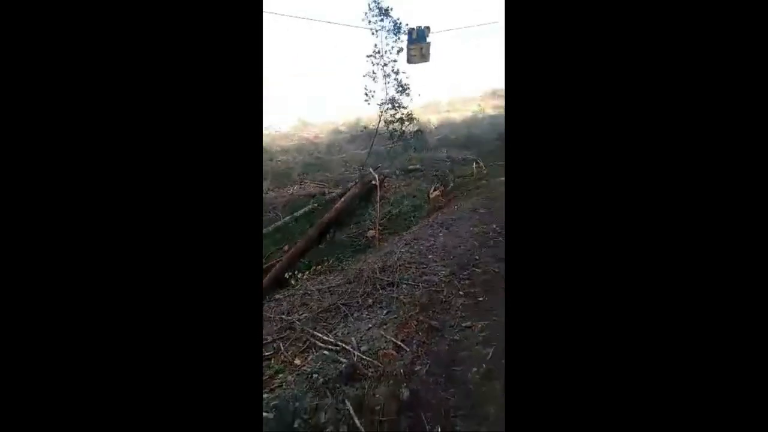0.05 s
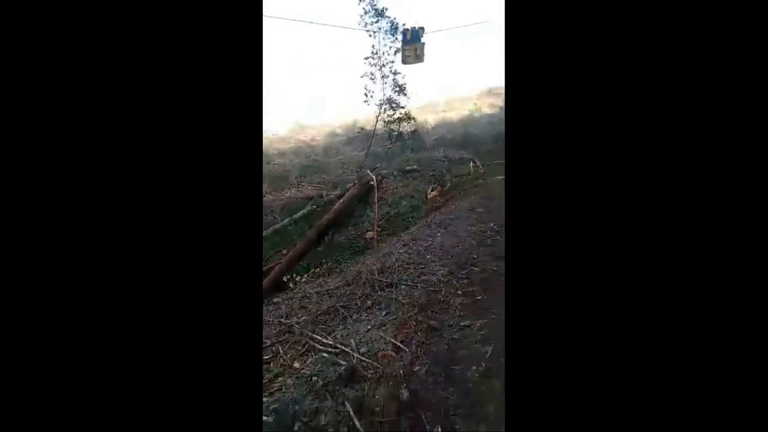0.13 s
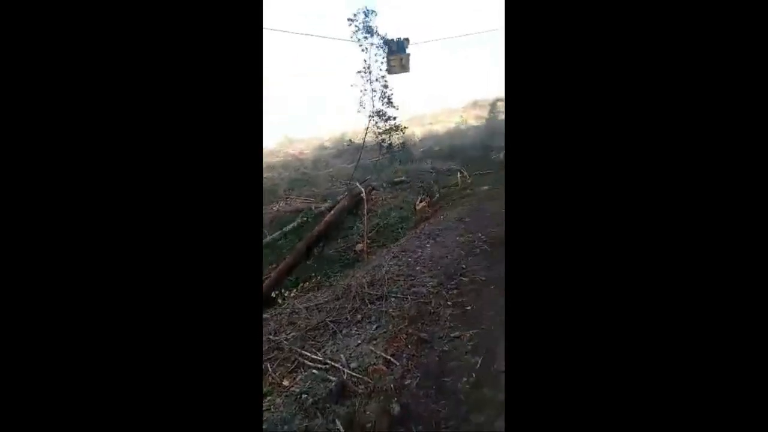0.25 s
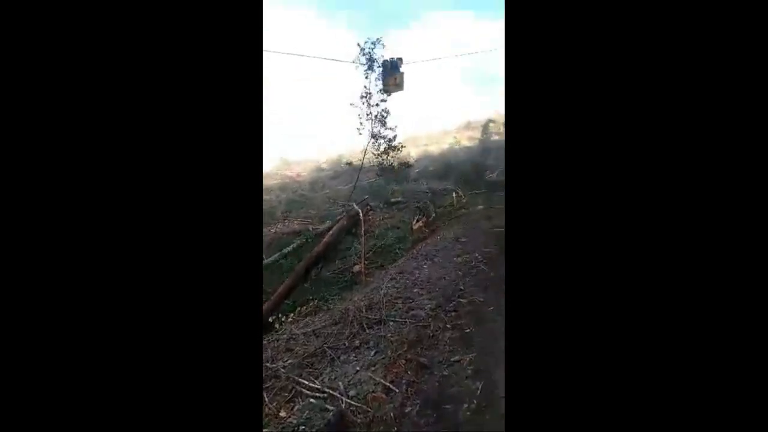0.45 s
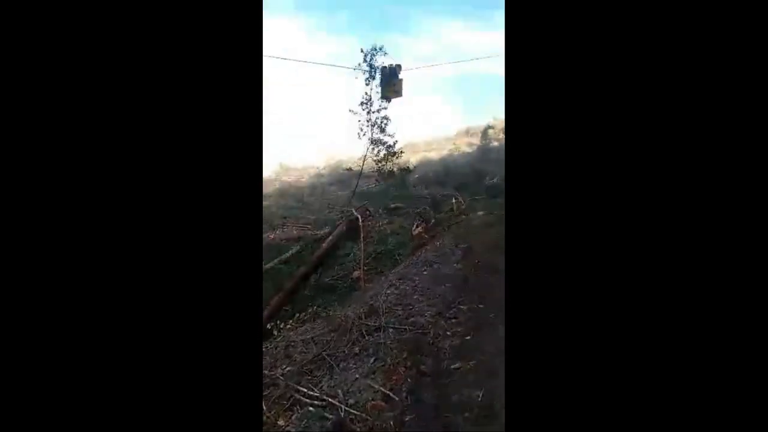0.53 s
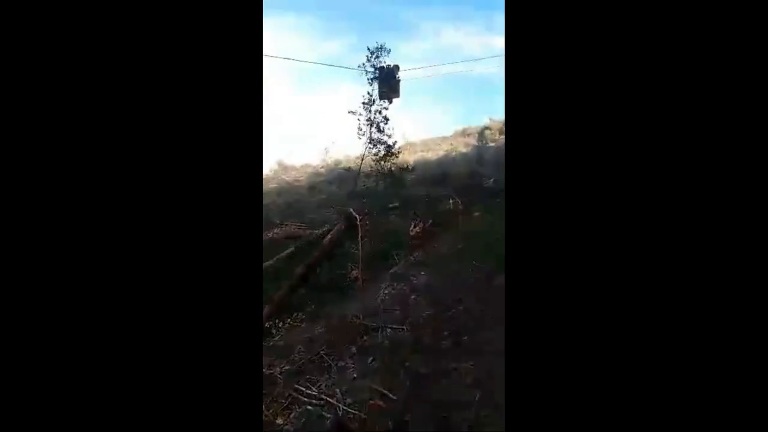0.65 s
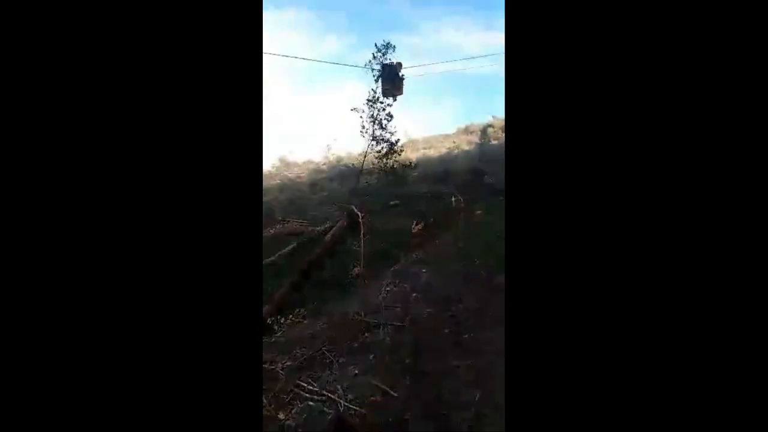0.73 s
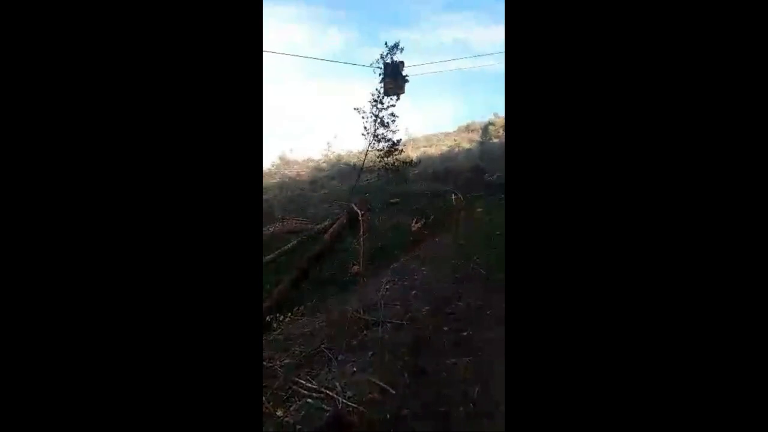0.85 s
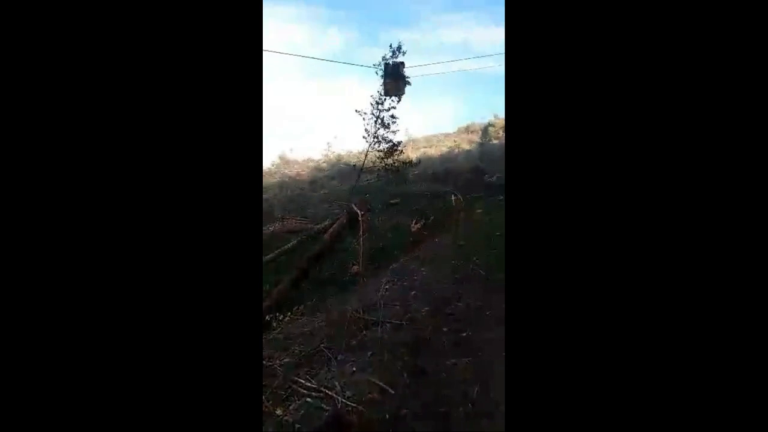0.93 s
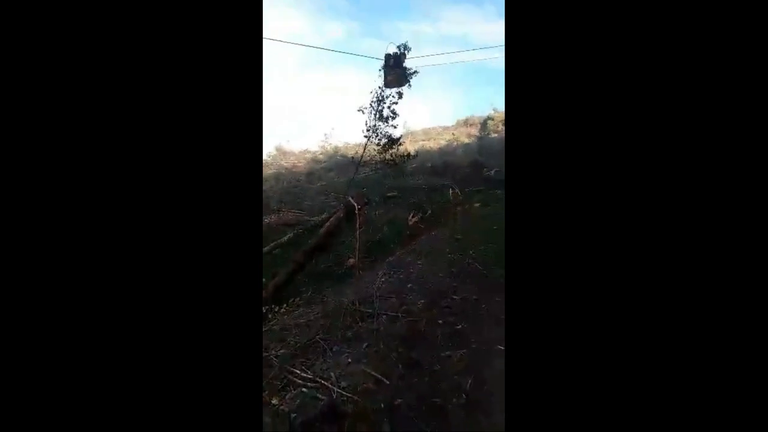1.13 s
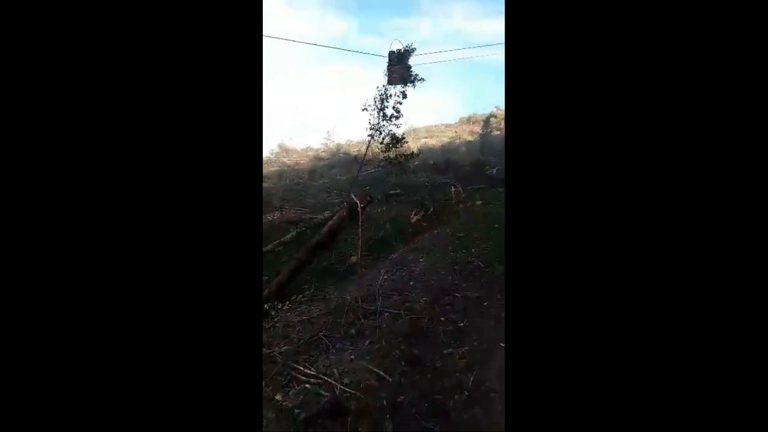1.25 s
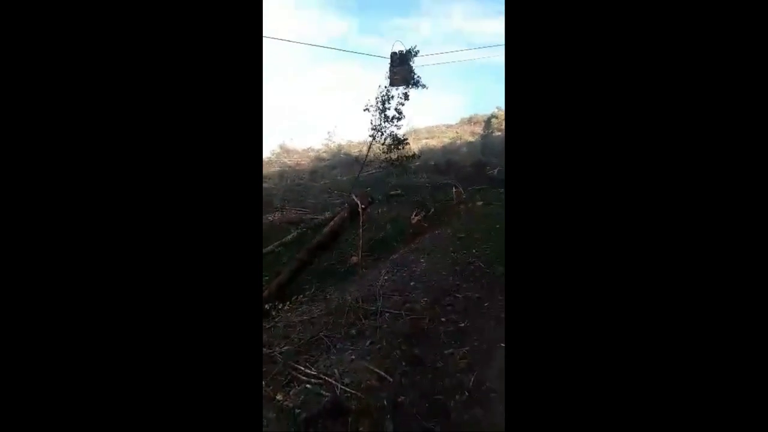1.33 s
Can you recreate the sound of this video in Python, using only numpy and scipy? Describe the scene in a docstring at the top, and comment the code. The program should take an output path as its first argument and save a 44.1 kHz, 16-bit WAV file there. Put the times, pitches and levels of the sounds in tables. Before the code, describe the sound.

A log on a cable strikes a hillside with a sharp crack and thud, then slides through dry brush, fading. Twigs snap and the rigging squeaks over a low diesel idle, heard in stereo outdoors.

```python
"""A log on a logging cable cracks against a hillside, thuds, and slides on through dry brushwood,
rustling and fading. Twigs snap, the running cable sings and scrapes, and the rigging squeaks.
In the background an eight-cylinder diesel idles unevenly over faint outdoor air.
Heard from a stereo microphone on the slope; the sound reaches its left port slightly before the right."""
import sys
import numpy as np
from scipy import signal
from scipy.fft import rfft, irfft, next_fast_len
from scipy.io import wavfile
from scipy.ndimage import map_coordinates

SR = 44100
rng = np.random.default_rng(int(sys.argv[2]) if len(sys.argv) > 2 else 0)


def waveform_to_disk(signal):
    """Save audio, clipped to [-1, 1], as 16-bit WAV at the path in sys.argv[1]."""
    frames = np.transpose(np.atleast_2d(signal))
    scaled = np.clip(frames, -1, 1) * 32767
    samples = np.round(scaled).astype(np.int16)
    wavfile.write(sys.argv[1], SR, samples)


N = 61739


def log_blows():
    """The log strikes the slope: hard contacts ring its upper modes, soft ground its lowest."""
    # blows and the spectrum of each contact: start_s, level_db, centre_hz, width_octaves
    blows = [(.2155, -18, 475, 0.75), (.2412, -9.5, 700, 0.43), (.2486, -4.5, 646, 0.6),
             (0.2542, -8, 376, 0.27), (0.2584, -2.5, 149, .6), (.265, -5.5, 140, 0.36),
             (0.2716, -12, 443, .7), (0.2867, -7, 310, .25), (0.2931, -5, 210, 0.19),
             (0.3029, -15, 220, 0.28), (0.3231, -18, 270, 0.43), (.343, -15, 168, 0.58),
             (.9682, -23, 710, 0.4)]
    # modes of the log: pitch_hz, level_db, t60_s
    modes = [(153, 4.5, 0.035), (218.5, 2, 0.084), (315, 2, 0.091), (388, -0.5, 0.061), (639, -7, 0.1),
             (675, 5.5, 0.033), (782, -2.5, 0.044), (977, -1.5, 0.061), (1400, 2, 0.15)]
    attack_s = 0.0018
    out = np.zeros(N)
    for start_s, blow_db, centre_hz, octaves in blows:
        t = since(start_s)
        attack = 1 - np.exp(-t / attack_s)
        for hz, mode_db, t60 in modes:
            weight = np.exp(-np.log2(hz / centre_hz) ** 2 / (2 * octaves ** 2)) / 2
            swing = np.sin(2 * np.pi * hz * t * (1 + rng.normal(0, 0.0041)))
            decay = amp(blow_db + mode_db + rng.normal(0, 1) - 60 * t / t60)
            out += weight * attack * decay * swing
    return out


def wood_cracks():
    """Dry wood splits in short bursts that ring in the treble, each with its own brightness."""
    # cracks: start_s, peak_db, t60_s, treble_edge_hz
    cracks = [(0.2081, -31, .02, 4000), (.2377, -4.5, 0.006, 5850), (0.2396, -2.5, 0.003, 9000),
              (0.2413, -12.5, .007, 6000), (0.2433, -7.5, 0.011, 3170), (0.437, -32, .023, 3500),
              (0.6804, -17.5, 0.015, 6000), (0.857, -22.5, 0.069, 3520), (0.9633, -19.5, 0.017, 3000),
              (0.969, -26, 0.048, 2600), (1.071, -28.5, 0.038, 4530)]
    # resonances of splintering wood: pitch_hz, width_hz, level_db
    splinter = [(730, 330, 3), (1410, 440, -8), (2250, 400, -3), (3240, 380, 1.5), (3740, 450, 6.5),
                (4410, 350, 5), (5510, 560, 5), (6600, 200, -1.5), (7320, 79, -20), (10520, 420, 4.5),
                (12070, 910, 3.5)]
    out = np.zeros((2, N))
    for start_s, peak_db, t60, edge_hz in cracks:
        t = since(start_s)
        burst = noise() * (t > 0) * amp(-60 * t / t60)
        ring = ringing(burst, splinter)
        crack = spread(filtered(ring, lambda hz: 1 / (1 + 1j * hz / edge_hz) ** 2))
        out += amp(peak_db) * crack / abs(crack).max()
    return out


def brush_crush():
    """Brushwood gives way under the landing log."""
    # spectrum of the crush: frequency_hz, level_db
    spectrum = [(30, -42), (80, -15), (140, -17), (230, -2.5), (340, -2), (520, -16.5), (680, -3),
                (950, -8.5), (1900, -15.5), (2600, -16), (3400, -42), (8000, -43), (13000, -65)]
    level_db, rise_s, t60_s = -19, 0.0054, 0.39
    t = since(start_s=0.2387)
    envelope = amp(level_db - 60 * t / t60_s) * (1 - np.exp(-t / rise_s))
    return envelope * coloured(twig_fractures(), spectrum)


def log_slide():
    """The log drags through twigs in small jerks while the cable sings."""
    # course of the slide: time_s, rustle_db, treble_db
    course = [(.195, -54, -60.5), (.21, -37, -48.5), (.235, -37, -56), (0.253, -24, -42.5),
              (.34, -28.5, -36.5), (.41, -34.5, -37.5), (0.454, -29, -35.5), (.52, -31.5, -42),
              (0.612, -35, -49.5), (.69, -31.5, -46), (.73, -34, -42.5), (.78, -37.5, -41),
              (.82, -39, -49.5), (0.863, -35, -46.5), (.92, -41, -46.5), (.98, -42, -54.5),
              (1.07, -47.5, -48.5), (1.18, -57, -65.5), (1.39, -85, -89)]
    # spectrum of the rustle: frequency_hz, level_db
    rustle = [(100, -29), (240, 12), (480, 2.5), (660, 11.5), (950, 3), (1400, 2.5), (2000, 6), (2700, -7),
              (3300, -1.5), (4800, -10.5), (5800, -30), (7000, -63), (9000, -59)]
    # spectrum of its treble fizz: frequency_hz, level_db
    fizz = [(3000, 4.5), (5500, 3), (6600, 2), (8000, -9), (9000, 1), (10600, -1), (11300, -12),
            (12500, -9), (13500, -54)]
    times, rustle_db, treble_db = np.transpose(course)
    jerk_db = 1.66
    level, treble = (amp(np.interp(since(0), times, db) + jerk_db * wobble(58.68))
                     for db in (rustle_db, treble_db))
    return level * (cable_song() + coloured(friction(), rustle)) + treble * coloured(friction(), fizz)


def friction():
    """Breaking twigs and scraping steel in equal parts."""
    return unit(twig_fractures()) + strand_scrapes()


def twig_fractures():
    """Twigs break in dense tiny clicks of uneven size."""
    clicks_per_s, spread_db = 9000, 1.5
    sizes = noise() * amp(spread_db * rng.standard_normal(N))
    return shifting_contact(sizes * (rng.random(N) < clicks_per_s / SR))


def shifting_contact(pair):
    """Narrow bands swell and fade on their own as the points of contact shift."""
    swell_db, width_hz, length_s = 4.5, 100, .08
    hz, t, bands = signal.stft(pair, SR, nperseg=1024)
    smooth = lambda axis, width: np.exp(-(2 * (axis[:, None] - axis) / width) ** 2)
    swells = smooth(hz, width_hz) @ rng.standard_normal(bands.shape[1:]) @ smooth(t, length_s)
    depth = np.interp(hz, [500, 4000], [.4, 1])[:, None]  # shallower in the bass
    gain = amp(swell_db * depth * np.clip(unit(swells), -2, 2))
    return signal.istft(bands * gain, SR, nperseg=1024)[1][:, :N]


def cable_song():
    """The running cable sings faintly at its narrow resonances."""
    # cable resonances: pitch_hz, width_hz, level_db
    resonances = [(1842, 57, 13.5), (2700, 22, -25), (3940, 36, 11.5), (5030, 40, -13), (5770, 66, 11),
                  (6360, 55, 3.5), (7570, 48, 0), (10660, 72, -3)]
    return amp(-9) * spread(ringing(noise(), resonances))


def strand_scrapes():
    """Strands of the cable catch and ring: many brief, rough, slightly falling tones, rms 1."""
    scrapes_per_s, fade_s, spread_db = 340, .016, 12
    range_hz, width_hz, sag_octaves_per_s = (4500, 12800), 25, .2
    out = np.zeros((2, N))
    for when, pitch, size, side in rng.random((int(scrapes_per_s * N / SR), 4)):
        t = (np.arange(N) - when * N) / SR
        near = abs(t) < 2 * fade_s
        hz = np.interp(pitch, [0, 1], range_hz) * 2 ** (-sag_octaves_per_s * t[near])
        rasp = np.sqrt(2 * np.pi * width_hz / SR) * rng.standard_normal(len(hz))
        tone = np.exp(-(t[near] / fade_s) ** 2) * np.sin(np.cumsum(2 * np.pi * hz / SR + rasp))
        pan = [np.cos(2 * np.pi * side), np.sin(2 * np.pi * side)]
        out[:, near] += amp(spread_db * size) * np.outer(pan, tone)
    return unit(out)


def rigging_squeaks():
    """Steel rubs on steel in short wavering tones; most sag in pitch."""
    # squeaks: start_s, hold_s, pitch_hz, level_db, sag_octaves_per_s
    squeaks = [(.241, .008, 5310, -34.5, 1.8), (.305, 0.032, 3387, -33, 1.6),
               (.392, 0.043, 5920, -35, 0.79), (.398, 0.02, 7000, -42, 1.1), (.435, 0.028, 1315, -35.5, 0),
               (0.438, 0.028, 5850, -32, .8), (.455, 0.014, 4920, -37.5, .9), (.695, 0.016, 1830, -40, 0),
               (0.788, 0.054, 1843, -21.5, 0.17), (.79, 0.048, 3950, -42.5, 0)]
    attack_s, t60_s, waver = .005, .22, .0016
    out = np.zeros(N)
    for start_s, hold_s, hz, db, sag in squeaks:
        t = since(start_s)
        pitch = hz * 2 ** (-sag * t) * (1 + waver * wobble(118.7))
        envelope = np.minimum(t / attack_s, 1) * amp(-60 * since(start_s + hold_s) / t60_s)
        out += envelope * amp(db + wobble(49.4)) * np.sin(2 * np.pi * np.cumsum(pitch) / SR)
    return out


def hillside_tail(hits):
    """The hillside scatters a short diffuse tail back to the microphone."""
    relative_db, t60_s = -10, .3
    t = np.arange(SR // 2) / SR
    scatter = rng.standard_normal((2, len(t))) * amp(-60 * t / t60_s)
    return amp(relative_db) * hits.std() * spread(signal.fftconvolve(hits, scatter, axes=1)[:, :N])


def diesel_idle():
    """Every firing gives an exhaust thump, a bark in the pipe and a burst of clatter."""
    # one engine cycle, a row per cylinder: thump_db, bark_db, clatter_db
    cylinders = [(-8, -7, -2.5), (-7.5, 3, 2), (-9, 0, -4.5), (-10.5, 4.5, 2.5), (-11.5, -10.5, -5),
                 (-.5, 3.5, -2.5), (-14, -2, -15), (-3, -3, -2.5)]
    # spectrum of the pipe's bark: frequency_hz, level_db
    bark_spectrum = [(60, -18), (130, 0.5), (200, -24.5), (255, 0), (325, 1), (450, -12), (530, -28),
                     (900, -48.5)]
    # spectrum of the clatter: frequency_hz, level_db
    clatter_spectrum = [(300, -11.5), (520, -9.5), (630, 6), (780, -6), (920, -9.5), (1250, -5),
                        (2000, -30), (2600, -20), (3800, -19.5), (6000, -57), (12500, -60)]
    # response that shapes the thump: frequency_hz, gain_db
    exhaust = [(20, -44), (55, -3.0), (72, -42), (84, -1.5), (100, 9.5), (160, 3), (300, 12.5)]
    cycle_s, first_firing_s, thump_s = .0954, 0.00825, 0.0027
    burst_lead_s, rise_s, decay_s = 0.00617, 0.00014, 0.0091
    t = since(0)
    thump, bark, clatter = np.zeros((3, N))
    for firing in range(int(N / SR / cycle_s + 1) * len(cylinders)):
        thump_db, bark_db, clatter_db = cylinders[firing % len(cylinders)] + rng.normal(0, 0.34, 3)
        offset = t - first_firing_s - firing * cycle_s / len(cylinders)
        near = abs(offset) < cycle_s / 2
        age = np.maximum(offset[near] + burst_lead_s, 0)
        burst = np.exp(-age / decay_s) * (1 - np.exp(-age / rise_s))
        thump[near] += amp(thump_db) * np.exp(-(offset[near] / thump_s) ** 2)
        bark[near] += amp(bark_db) * burst
        clatter[near] += amp(clatter_db) * burst
    thump = filtered(thump, lambda hz: amp(along(exhaust, hz)))
    bark = coloured(bark * noise(), bark_spectrum)
    clatter = coloured(clatter * noise(), clatter_spectrum)
    return amp(-24) * thump + amp(-41.5) * (bark + clatter)


def outdoor_air():
    """A faint, steady rumble and hiss."""
    # spectrum of the air: frequency_hz, level_db
    spectrum = [(15, -49), (25, -1.5), (87, -15), (326, -7), (498, -9.5), (649, -29), (1920, -11),
                (2640, -22), (5110, -28), (11900, -49), (14000, -82)]
    return amp(-45.5) * coloured(noise(), spectrum)


def amp(db):
    """Decibels to gain."""
    return 10 ** (np.asarray(db) / 20)


def unit(x):
    """Scale to rms 1."""
    return x / np.sqrt(np.mean(x ** 2) + 1e-20)


def along(points, hz):
    """Interpolate (frequency_hz, value) points on a log axis."""
    knots_hz, values = np.transpose(points)
    return np.interp(np.log(hz + 1), np.log(knots_hz + 1), values)


def since(start_s):
    """Seconds after start_s, zero before."""
    return np.maximum(np.arange(N) / SR - start_s, 0)


def noise():
    """Two white noises."""
    return rng.standard_normal((2, N))


def wobble(knots_per_s):
    """A smooth random curve."""
    knots = rng.standard_normal(int(N * knots_per_s / SR) + 4)
    return map_coordinates(knots, [np.arange(N) * knots_per_s / SR])


def filtered(x, response):
    """Filter x by a complex response of frequency."""
    size = next_fast_len(N + SR // 2)
    return irfft(rfft(x, size) * response(np.fft.rfftfreq(size, 1 / SR)), size)[..., :N]


def ringing(x, peaks):
    """Pass x through parallel resonances."""
    return filtered(x, lambda hz: sum(amp(db) * 1j * hz * width / (pitch ** 2 - hz ** 2 + 1j * hz * width)
                                      for pitch, width, db in peaks))


def spread(pair):
    """Two unrelated signals become partly alike left and right, rms 1."""
    # likeness at the two ports: frequency_hz, correlation
    likeness = [(100, 1), (170, 0.97), (300, 0.97), (650, 0.76), (1200, 0.17), (2500, 0.63), (6000, 0.25),
                (12000, 0.073)]
    turn = lambda hz: np.arccos(np.clip(along(likeness, hz), -1, 1)) / 2
    mid, side = filtered(pair, lambda hz: np.array([np.cos(turn(hz)), np.sin(turn(hz))]))
    return unit(np.array([mid + side, mid - side]))


def coloured(pair, spectrum):
    """Stereo sound of rms 1, shaped by the given spectrum."""
    return spread(filtered(pair, lambda hz: amp(along(spectrum, hz))))


def scene():
    """Log, rigging and engine reach the left port a little earlier and louder than the right."""
    # balance of the ports: frequency_hz, left_over_right_db
    balance = [(200, 0), (550, 2), (1100, 3), (2200, 1.5), (5000, 0.3), (9000, 0), (12500, 0.5)]
    left_lead_s, sides = .00023, np.array([[.5], [-.5]])
    hits = wood_cracks() + log_blows()
    log = hits + hillside_tail(hits) + brush_crush() + log_slide()
    mix = log + rigging_squeaks() + diesel_idle() + outdoor_air()
    lead = lambda hz: np.exp(2j * np.pi * hz * left_lead_s * sides)
    return filtered(mix, lambda hz: amp(sides * along(balance, hz)) * lead(hz))


def record(dry):
    """The microphone thins the deepest bass and cuts the top treble steeply."""
    low_cut_hz, top_hz = 30, 13300
    thinned = filtered(dry, lambda hz: (1j * hz / (low_cut_hz + 1j * hz)) ** 2)
    return filtered(thinned, lambda hz: 1 / np.sqrt(1 + (hz / top_hz) ** 80))


dry = scene()
out = record(dry)
waveform_to_disk(out)
```